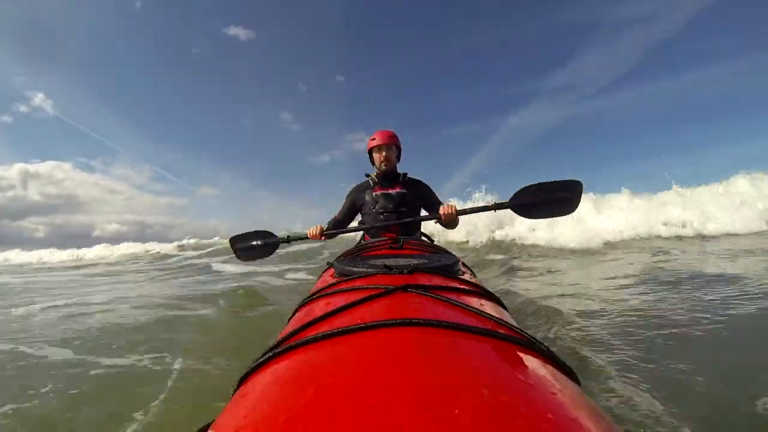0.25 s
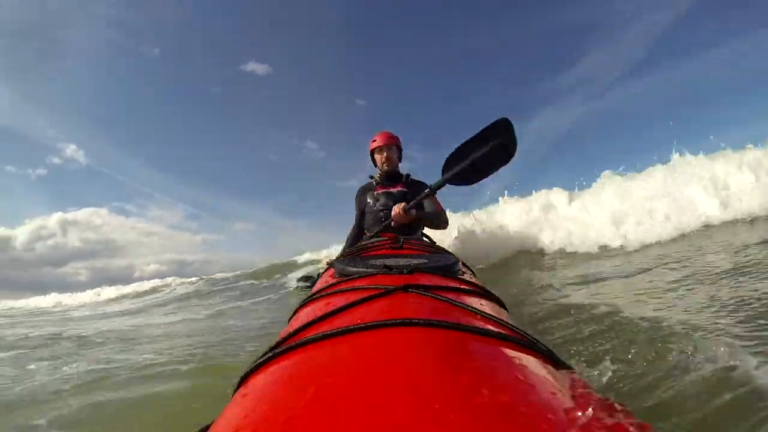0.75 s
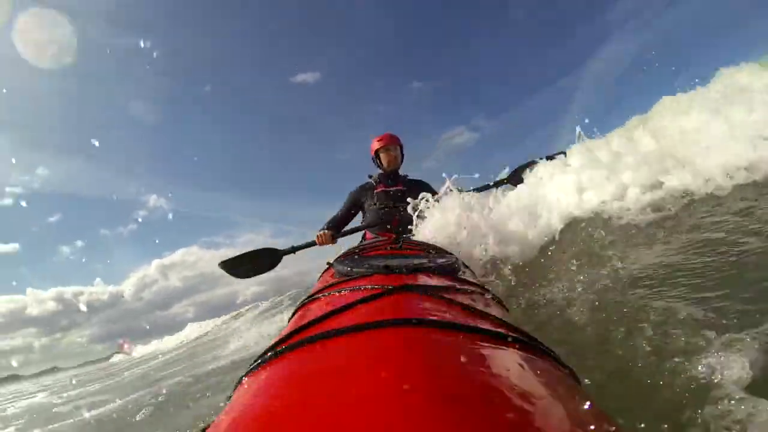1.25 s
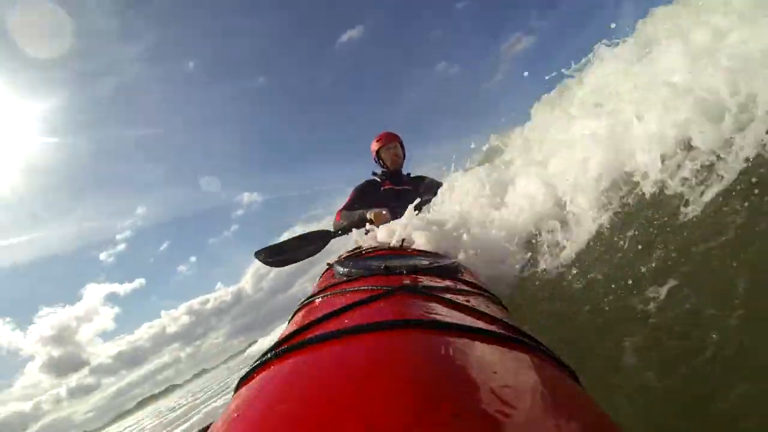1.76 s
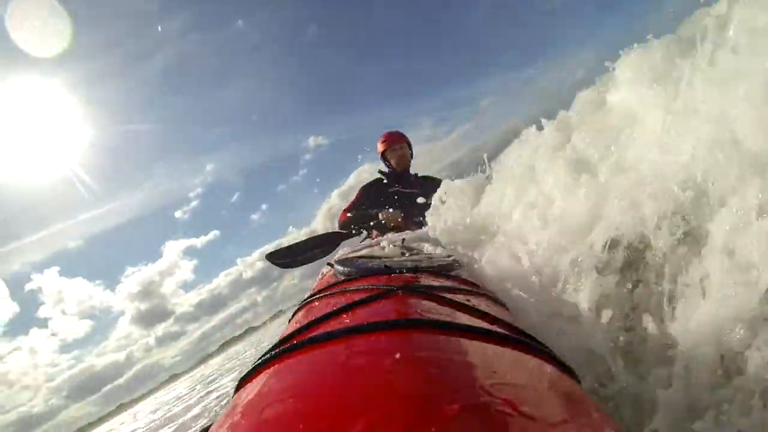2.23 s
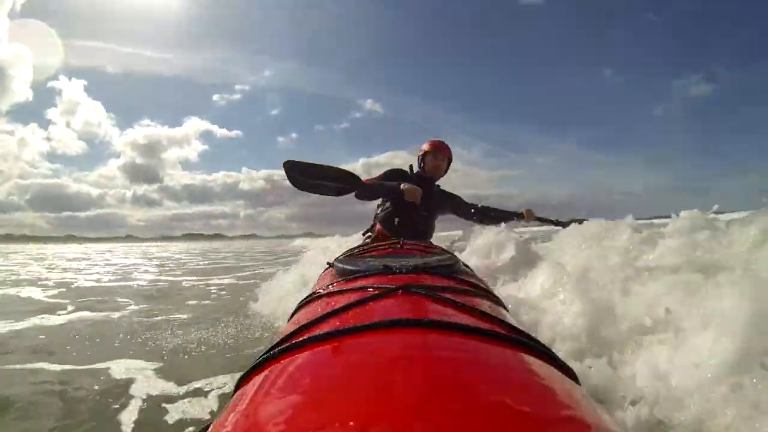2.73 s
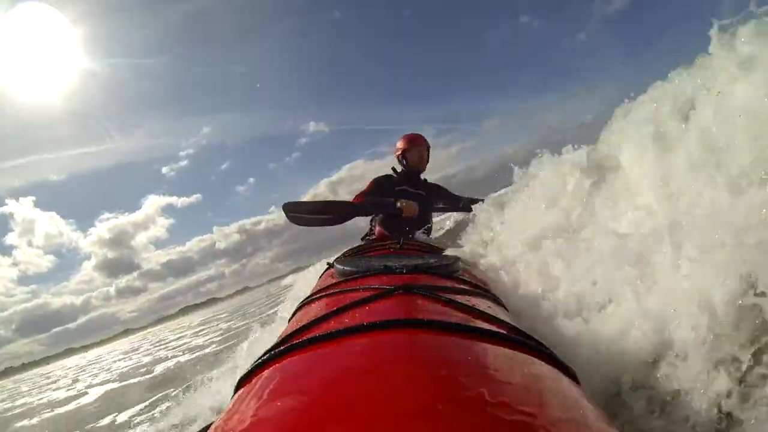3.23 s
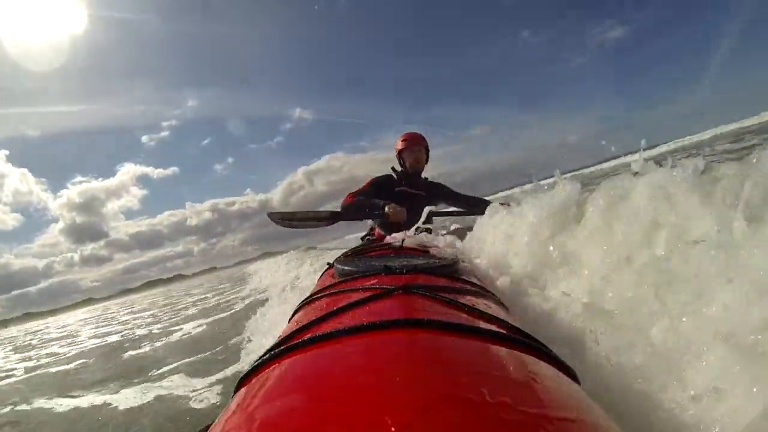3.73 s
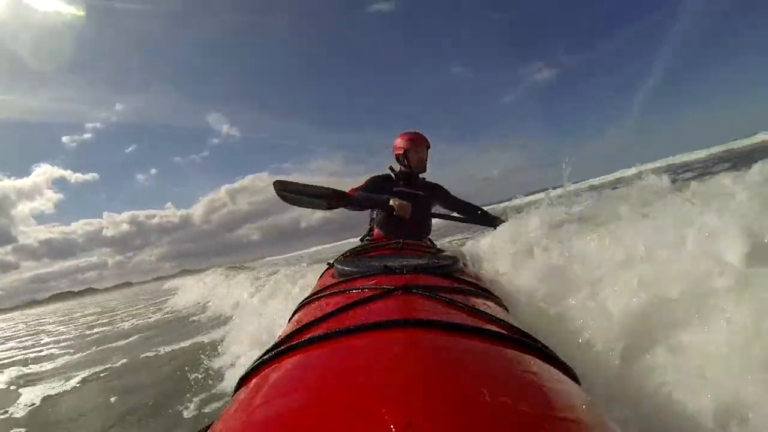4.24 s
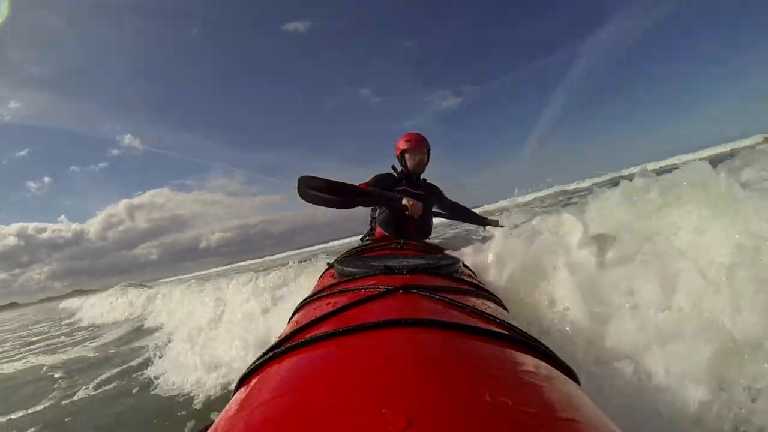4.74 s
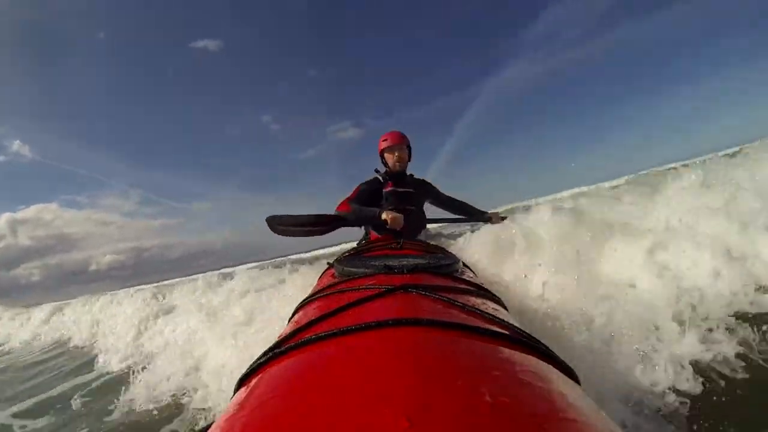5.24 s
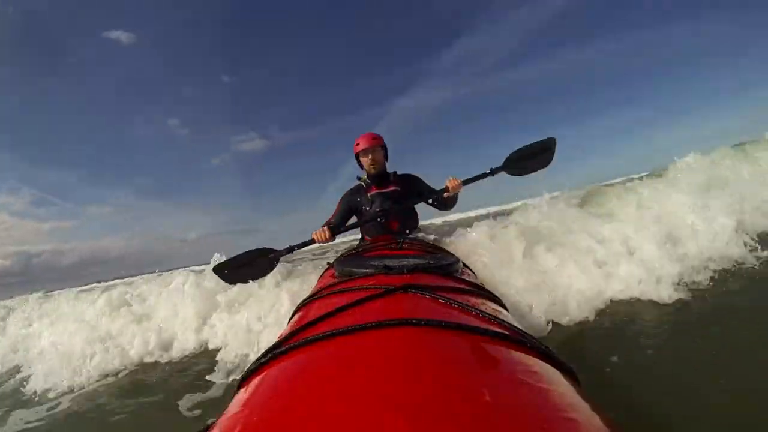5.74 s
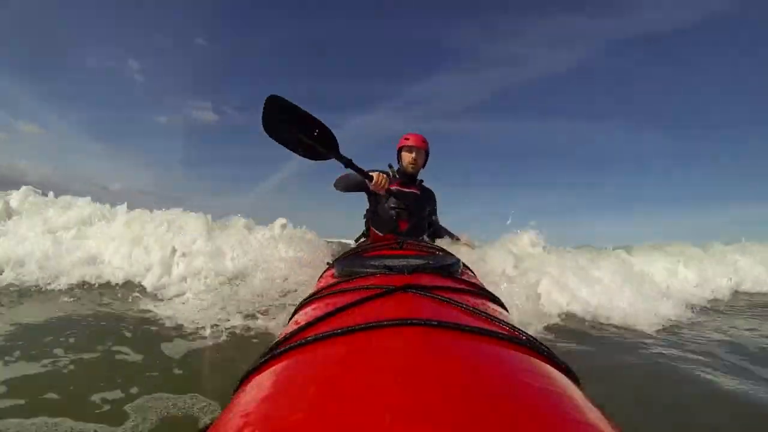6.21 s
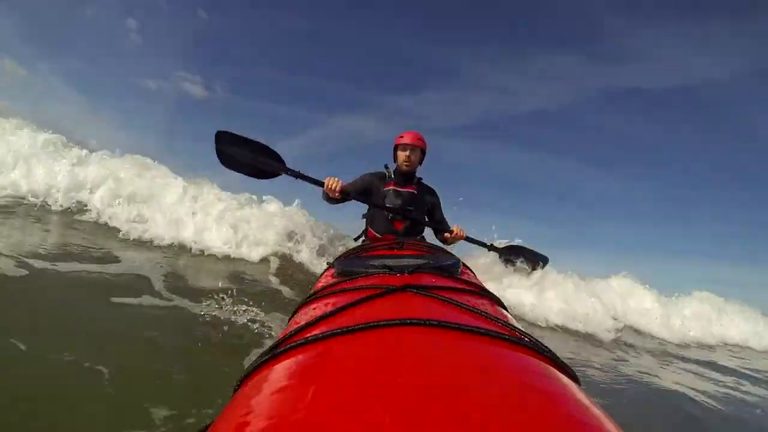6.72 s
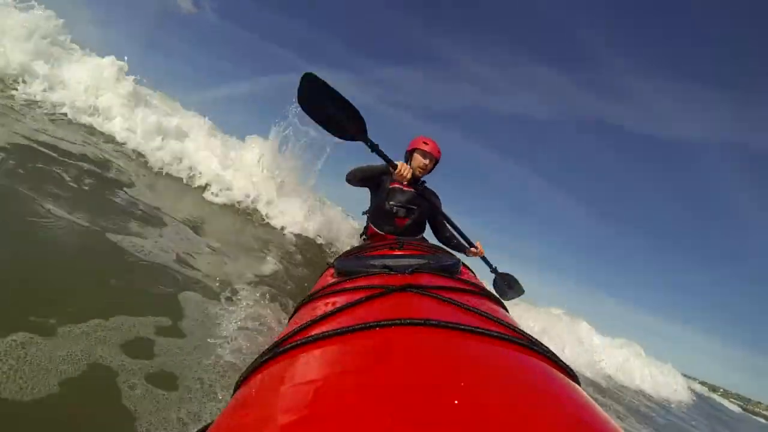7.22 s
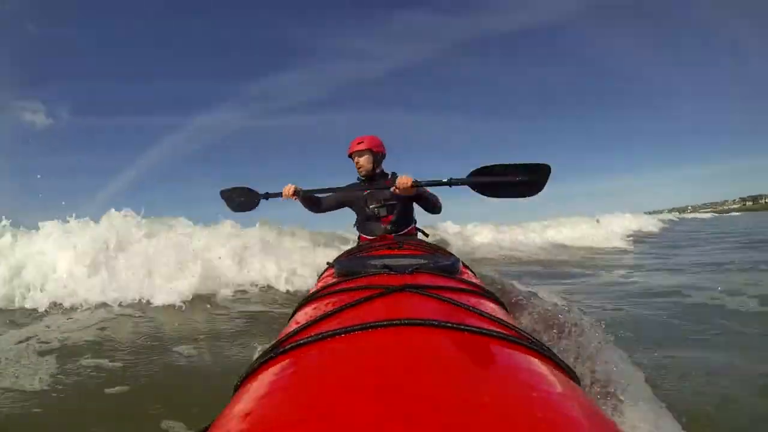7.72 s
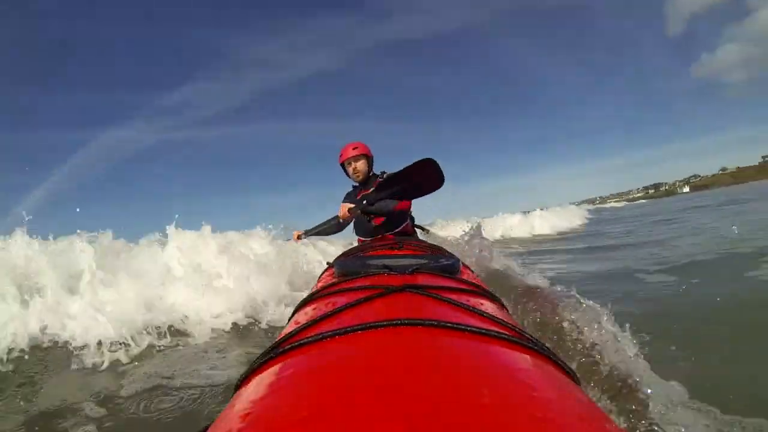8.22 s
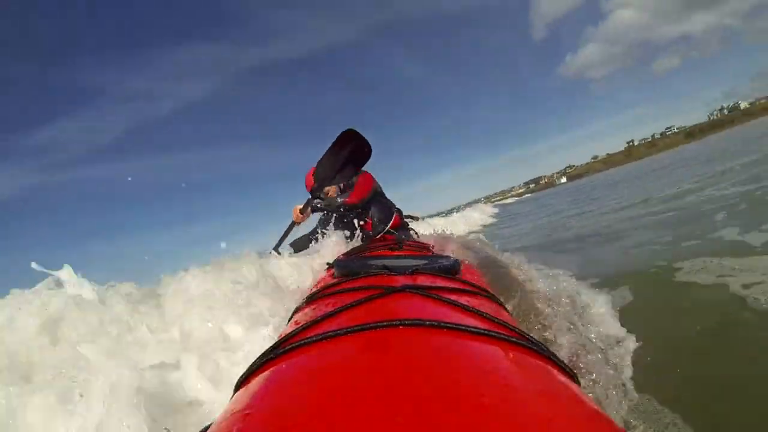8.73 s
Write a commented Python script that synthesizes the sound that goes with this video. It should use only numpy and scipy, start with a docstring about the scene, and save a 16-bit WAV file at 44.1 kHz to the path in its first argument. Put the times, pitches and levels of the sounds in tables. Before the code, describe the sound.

The microphone sits inside a waterproof case on a kayak's bow, so the surf sounds boxy and muffled, over a hollow, booming hull. At first there is only low wash, faint foam fizz and small plops. From 0.6 to 1.3 s close splashing bursts in, lumpy and bubbly, with ringing plops, spray ticks, paddle gulps and sharp slaps. More plops and a hard slap come at 1.5-2 s. Around 2.1 s a dull breaker roar and deep buffeting swell, then drop briefly. From 2.7 to 4 s wave slaps crack, knock and thud in quick runs, with plastic clicks and very low mount throbs. From 4 to 6 s the wash is steadier and duller, with scattered slaps. At 6-7.5 s bubbly splashes and hissing water sheets return. Plops, slaps and a click follow; from 8.3 s the rush and rumble strengthen, ending amid heavy splashes near 9 s.

```python
"""A kayak punches through breaking surf, heard from a camera in a waterproof case on its bow.
From the start whitewater roars and foam fizzes, noise drums on the hull and the camera mount swings low.
Soon sheets of water hiss past, air pockets plop, drips fall, spray ticks on the case and the paddle gulps.
Then waves slap the bow in runs of noise blows, and from two seconds on the housing clicks now and then.
Filters shaped like the case, the deck and the hollow hull give most layers a boxy or booming ring."""
import sys
import numpy as np
from scipy import signal
from scipy.fft import rfft, irfft, next_fast_len
from scipy.io import wavfile
from scipy.ndimage import uniform_filter1d, minimum_filter1d

SR = 44100
rng = np.random.default_rng(int(sys.argv[2]) if len(sys.argv) > 2 else 0)


def file_out(sig):
    """Save sig as 16-bit WAV at sys.argv[1]."""
    # one column per channel
    cols = np.atleast_2d(sig).T
    # limit, then scale
    lim = np.clip(cols, -1, 1)
    pcm = np.round(lim * 32767).astype(np.int16)
    wavfile.write(sys.argv[1], SR, pcm)


N = 395577
TIME = np.arange(N) / SR  # s


def gain_of(db):
    """Decibels to amplitude."""
    return 10 ** (np.asarray(db) / 20)


def evened(x):
    """Scales to rms 1."""
    return x / np.sqrt(np.mean(x ** 2) + 1e-20)


def curve(rows):
    """Joins (seconds, value) rows by straight lines."""
    seconds, values = np.transpose(rows)
    return np.interp(TIME, seconds, values)


def add(mix, start_s, sound):
    """Mixes a sound in at its start time, cut off at the end of the mix."""
    part = mix[max(round(start_s * SR), 0):][:len(sound)]
    part += sound[:len(part)]


def body(points, rings=(), size=8192):
    """Minimum-phase impulse response of a (Hz, dB) spectrum with resonances on top."""
    hz = np.fft.rfftfreq(size, 1 / SR)
    point_hz, point_db = np.transpose(points)
    db = np.interp(np.log(hz + 1), np.log(point_hz + 1), point_db)
    for centre_hz, width_hz, lift_db in rings:
        db = db + lift_db / (1 + (2 * (hz - centre_hz) / width_hz) ** 2)
    both_sides_db = np.r_[db, db[-2:0:-1]]
    log_gain = np.log(gain_of(both_sides_db))
    # the Hilbert transform of the log gain supplies the phase
    spectrum = np.exp(np.conj(signal.hilbert(log_gain)))
    return np.fft.ifft(spectrum).real[:size // 2]


def through(x, response):
    """Passes a sound through a body."""
    return signal.oaconvolve(x, response)[:len(x)]


def dulled(x, hz):
    """A gentle one-pole low-pass."""
    return signal.lfilter([1], [1, -np.exp(-2 * np.pi * hz / SR)], x)


def drift(per_s, order=16):
    """Smooth random wandering of rms 1, with rates above about per_s fading out."""
    size = next_fast_len(N // order + 2)  # made at a lower rate, then interpolated
    hz = np.fft.rfftfreq(size, order / SR)
    spectrum = rfft(rng.standard_normal(size)) * np.exp(-(hz / per_s) ** 2)
    slow = evened(irfft(spectrum, size))
    return np.interp(np.arange(N) / order, np.arange(size), slow)


def surges(rows, rise_s, fall_s):
    """Summed power of pushes that each build up, hold for their length and die away."""
    power = np.zeros(N)
    age = np.arange(SR) / SR
    for start_s, length_s, db in rows:
        rise = 1 - np.exp(-age / rise_s)
        fall = np.exp(-np.maximum(age - length_s, 0) / fall_s)
        add(power, start_s, (gain_of(db) * rise * fall) ** 2)
    return power


def bubble(hz, cycles, glide, size=2048):
    """A pocket of air rings and dies; its pitch climbs as it nears the surface."""
    age = np.arange(size) / SR * hz / cycles  # in decay times
    turns = cycles * (age + glide * (age - 1 + np.exp(-age)))
    envelope = np.exp(-age) * (1 - np.exp(-5 * age))
    return np.sin(2 * np.pi * turns) * envelope


def gurgle(per_s, spread_db, low_hz, high_hz, cycles, count=30):
    """Swarms of bubbles around count pitches; a spread makes many faint and a few strong."""
    out = np.zeros(N)
    for hz in np.geomspace(low_hz, high_hz, count):
        chance, place, strength = rng.random((3, 3000))
        born = chance < per_s * N / SR / count / len(chance)
        strengths = gain_of(spread_db * np.minimum(-np.log(1 - strength), 3))
        births = np.bincount((place * N).astype(int), strengths * born, N)
        pitch_hz = hz * 2 ** (rng.normal() / 20)
        ring_cycles = cycles * (.5 + rng.random())
        ring = bubble(pitch_hz, ring_cycles, glide=0.046 * rng.random(), size=1024)
        out += hz * through(births, ring)  # higher pitches are weighted up
    return evened(out)


def blow(response, decay_s, size=6000):
    """A sudden impact and the turbulence behind it ring a body; slower decays carry more energy."""
    push = rng.standard_normal(size) * np.exp(-np.arange(size) / SR / decay_s)
    push[0] = 0.49 * np.linalg.norm(push)  # the impact itself
    sound = through(push, response)
    return sound / np.linalg.norm(sound) * np.sqrt(decay_s * SR / 10)


# Loudness of the surf as breakers come and go. Each row: time in seconds, relative level in dB.
SURF_LEVEL = [(0, -38), (.55, -32), (.8, -22), (1.35, -21.5), (1.62, -28.5), (1.98, -22), (2.22, -19),
              (2.34, -30), (2.62, -33), (2.8, -27.5), (3.45, -27.5), (4.6, -31), (5.8, -31), (6.6, -23.5),
              (7.0, -24), (7.7, -24), (8.55, -21), (8.97, -21.5)]
# Loads of water thrown over the bow by paddle and waves.
# Each row: start in seconds, length in seconds, relative level in dB.
BOW_SPLASHES = [(0.285, 0.073, -35), (0.645, 0.1, -25), (0.76, .1, -17.5), (0.9, 0.022, -21.5),
                (1.1, 0.22, -19.5), (1.765, .05, -16), (2.11, 0.022, -17.5), (4.07, 0.14, -31),
                (4.86, .05, -26.5), (6.01, 0.016, -24.5), (6.17, 0.026, -22), (6.74, 0.12, -21.5),
                (7.18, 0.057, -22), (8.74, 0.024, -15)]


def water_level():
    """Amplitude of the water at the bow: the surf with the splashes added in power."""
    surf_power = gain_of(curve(SURF_LEVEL)) ** 2
    return np.sqrt(surf_power + surges(BOW_SPLASHES, rise_s=0.0063, fall_s=0.031))


# How much of the water is close splashing rather than far roar.
# Each row: time in seconds, share of the power from 0 to 1.
CLOSE_SHARE = [(0, 0.15), (.55, 0.88), (.7, 0.87), (1.35, 0.72), (1.6, 0.2), (2.15, 0), (2.4, 0.26),
               (5.9, 0.1), (6.4, 0.71), (7.3, 0.63), (8.97, 0.27)]


def water(case, roar_db=-1, wash_db=-1, dull_hz=2200):
    """The far roar is smooth and dull; close splashing is lumpy, bright and full of bubbles."""
    near = curve(CLOSE_SHARE)
    roar = dulled(rng.standard_normal(N), dull_hz) * gain_of(2.2 * drift(per_s=26))
    wash = gain_of(wash_db) * rng.standard_normal(N)
    bubbles = gurgle(per_s=3000, spread_db=7.5, low_hz=703, high_hz=6404, cycles=5.3)
    splash = (bubbles + wash) * gain_of(3.7 * near * drift(per_s=19))  # the closer, the lumpier
    colour = body([(300, 1.0), (800, -6), (1350, -3.5), (1800, 2.5), (3500, 0.0),
                   (4800, -2.0), (6500, 0.5), (12000, -14.5)])
    splash = through(splash, colour)
    far = gain_of(roar_db) * np.sqrt(1 - near) * evened(through(roar, case))
    close = np.sqrt(near) * evened(through(splash, case))
    return water_level() * (far + close)


# Bursting foam. Each row: time in seconds, level in dB before the foam trim.
FOAM_LEVEL = [(0.0, -63.5), (0.37, -64), (0.87, -57), (1.26, -57), (1.93, -58.5), (2.28, -54.5),
              (2.77, -58), (3.25, -55), (5.43, -61), (7.51, -61), (8.65, -59), (8.75, -59.5), (8.9, -62)]
# Colour of the foam as it hisses through the case. Each row: frequency in Hz, relative level in dB per Hz.
FOAM_COLOUR = [(2470, -33), (4200, -3.5), (5100, -5.5), (5970, -9.5), (6650, -10), (7560, -10), (8520, -13),
               (9390, -19.5), (10000, -17), (12200, -18.5), (13800, -20.5), (15300, -22)]


def foam(level_db=3):
    """Countless tiny bursts merge into a faint hiss: filtered noise with a fast flutter."""
    bursts = rng.standard_normal(N) * gain_of(1.6 * drift(per_s=320))
    return gain_of(curve(FOAM_LEVEL) + level_db) * evened(through(bursts, body(FOAM_COLOUR)))


# Buffeting of the hull by wind and water. Each row: time in seconds, relative level in dB.
BUFFETING = [(0, -42.5), (.75, -32.5), (1.3, -29), (2.1, -18), (2.62, -31), (2.78, -20.5), (3.25, -22.5),
             (3.55, -26), (4.6, -25), (4.85, -23), (5.75, -28), (6.12, -23.5), (6.3, -34), (7.0, -31),
             (7.25, -28), (8.15, -32), (8.45, -23.5), (8.97, -24)]


def rumble(hull, deck, level_db=-1, lumpy_db=3.0, churn_db=-16):
    """Gusts and heavy water drum on the hollow boat and churn big bubbles under the deck."""
    push = rng.standard_normal(N) * gain_of(lumpy_db * drift(per_s=53))
    churn = gurgle(per_s=600, spread_db=0.0, low_hz=328.0, high_hz=1289, cycles=7.7, count=14)
    drumming = gain_of(level_db) * evened(through(push, hull))
    churning = gain_of(churn_db) * evened(through(churn, deck))
    return gain_of(curve(BUFFETING)) * (drumming + churning)


# Centre of the mount's natural frequency under changing load. Each row: time in seconds, frequency in Hz.
MOUNT_PITCH = [(0.0, 35.06), (2.1, 33.95), (2.27, 31.7), (2.72, 35.6), (7.55, 33.97), (8.22, 38.46),
               (8.32, 34.04), (8.97, 37.5)]
# Swells that heave the boat and set the camera mount swinging.
# Each row: start in seconds, length in seconds, relative level in dB.
SWELLS = [(1.21, .38, -14.5), (1.75, 0.34, -5.5), (2.66, 0.095, -7.5), (3.1, .27, -11), (3.82, 0.078, -6.5),
          (4.22, 0.093, -13), (4.5, 0.28, -12), (4.77, 0.26, -8), (5.2, 0.16, -10.5), (5.42, 0.23, -8.5),
          (5.96, 0.35, -11.5), (6.35, 0.24, -21), (7.48, 0.16, -13.5), (7.75, 0.17, -15.5),
          (8.3, 0.22, -13), (8.42, 0.31, -9.5), (8.75, 0.2, -4.5)]


def mount(level_db=-1, flutter_db=1.3, waver=0.0395, over_buffeting_db=7.5, limit_db=-20):
    """Swells swing the camera at a low, wavering pitch; random buffeting pushes build it up or stall it."""
    shaken = gain_of(np.minimum(curve(BUFFETING) + over_buffeting_db, limit_db))
    pushes = (drift(per_s=5.3) + 1j * drift(per_s=7.2)) / np.sqrt(2)
    heave = np.sqrt(surges(SWELLS, rise_s=0.025, fall_s=0.099))
    heave = heave * gain_of(flutter_db * drift(per_s=26))
    hz = curve(MOUNT_PITCH) * (1 + waver * drift(per_s=10.4))
    turns = np.cumsum(hz) / SR
    swing = (heave + shaken * pushes) * np.exp(2j * np.pi * turns)
    return gain_of(level_db) * np.sqrt(2) * swing.real


# Sheets of whitewater hissing along the deck. Each row: start in seconds, length in seconds, level in dB.
DECK_SHEETS = [(0.1, 0.025, -39), (0.53, 0.022, -37), (1.26, 0.032, -35), (4.06, 0.05, -52),
               (6.28, 0.38, -39.5), (6.55, .32, -44), (7.14, 0.061, -33), (7.45, 0.52, -45.5)]


def sheets(case):
    """Thin, fast water seethes with countless tiny bubbles: bright noise with a fast flutter."""
    seethe = rng.standard_normal(N) * gain_of(2.3 * drift(per_s=150))
    colour = body([(500, -31.5), (1600, -18.5), (2600, 0.5), (3500, 2), (5000, -4), (9000, -8)])
    seethe = evened(through(through(seethe, colour), case))
    return np.sqrt(surges(DECK_SHEETS, rise_s=0.014, fall_s=.035)) * seethe


# The strongest single bubbles.
# Each row: start in seconds, peak in dB before the plop trims, starting pitch in Hz.
SINGLE_BUBBLES = [(0.169, -31, 955), (0.187, -25, 1790), (0.295, -15.5, 1750), (0.338, -12, 1480),
                  (0.358, -17, 1860), (0.445, -23, 836), (0.456, -23, 2440), (0.528, -17, 1360),
                  (0.652, -8, 1400), (0.665, -7, 1705), (0.682, -5.5, 1406), (0.78, -5.5, 1363),
                  (0.953, -12, 3250), (0.987, -19, 2880), (1.006, -6.5, 1530), (1.117, -4, 1790),
                  (1.145, -15, 3390), (1.219, -6.5, 1350), (1.502, -11.5, 1390), (1.691, -10.5, 1940),
                  (1.74, -7, 1535), (1.962, -10.5, 1650), (6.778, -13.5, 1750), (6.823, -9, 1590),
                  (7.025, -7.5, 1755), (7.555, -10.5, 1457), (7.909, -8.5, 1670), (8.261, -9, 1620),
                  (8.406, -6.5, 1690)]


def plops(case, level_db=-.5, smack_db=-5, satellites_db=-9, count=3):
    """Water smacks shut over a pocket of air, which rings and sheds a few smaller bubbles."""
    out = np.zeros(N)
    for start_s, peak_db, hz in SINGLE_BUBBLES:
        ring = bubble(hz, cycles=6.2, glide=0.013)
        add(out, start_s, gain_of(peak_db + level_db) * ring / abs(ring).max())
        add(out, start_s, gain_of(peak_db + smack_db) * blow(case, decay_s=0.0025))
        for delay, pitch in rng.random((count, 2)):
            shed = bubble(hz * (.85 + .6 * pitch), cycles=2.8, glide=.03)
            add(out, start_s + 0.013 * delay, gain_of(peak_db + satellites_db) * shed)
    return out


def droplets(level_db=-17):
    """Thrown water falls back as small bright drips, strongest when the splashing is close."""
    drips = gurgle(per_s=34, spread_db=13.5, low_hz=2040, high_hz=6080, cycles=4.7, count=22)
    drips = through(drips, body([(3500, 1), (4300, -8.5), (6000, -16.0)]))
    thrown = curve(CLOSE_SHARE) ** 4  # nearly silent unless splashing dominates
    return water_level() * gain_of(level_db) * thrown * evened(drips)


# Handfuls of spray landing on the case.
# Each row: start in seconds, relative level in dB, decay time in seconds.
SPRAY_HANDFULS = [(0.64, -47, .012), (0.813, -35, 0.032), (0.841, -34, 0.024), (0.901, -37.5, 0.025),
                  (1.107, -37, .012), (1.217, -36, 0.028), (1.293, -37, 0.0099), (1.506, -37.5, 0.0082)]


def spray(drops_per_s=1300, mist_db=-22, size=4000):
    """Handfuls of drops strike the case itself, so they keep their treble."""
    out, age = np.zeros(N), np.arange(size) / SR
    shell = body([(800, -15), (1700, -3), (3500, 29), (5800, 17), (7500, 9.5), (15000, 3)])
    for start_s, level_db, decay_s in SPRAY_HANDFULS:
        strength, mist = rng.standard_normal((2, size))
        landing = rng.random(size) < drops_per_s / SR
        drops = .5 * strength * landing + gain_of(mist_db) * mist
        drops[0] = 1  # a set drop leads
        ticks = through(drops * np.exp(-age / decay_s), shell)
        add(out, start_s, gain_of(level_db) * 2 * ticks)
    return out


# The paddle blade digging in and stirring big bubbles.
# Each row: start in seconds, length in seconds, level in dB.
PADDLE_STROKES = [(0.66, .06, -25.5), (0.755, 0.023, -14), (1.18, 0.11, -24), (1.92, .28, -31.5),
                  (2.72, 0.096, -32), (7.2, 0.074, -27.5), (8.38, .22, -26.5), (8.68, 0.076, -30)]


def strokes(case):
    """The blade drags air under water, where it gulps in large, low bubbles."""
    gulps = gurgle(per_s=1200, spread_db=4.0, low_hz=714, high_hz=1376, cycles=4.4, count=14)
    return np.sqrt(surges(PADDLE_STROKES, rise_s=.012, fall_s=0.027)) * evened(through(gulps, case))


# Waves slapping the bow. Each row: start in seconds, crack, knock of the deck and thud of the hull
# in dB before the slap trims, clatter length in seconds.
BOW_SLAPS = [(0.764, -3, -24, -23.5, .006), (0.832, 0.5, -45, -26, .005), (1.165, -2, -41, -20, .005),
             (1.775, -1.5, -12, -17, .022), (2.0835, -5, -22, -17, .007), (2.7048, -13, -22.5, -14, 0.046),
             (2.9107, -8.5, -13.5, -4.5, 0.036), (3.072, -3.5, -10.5, -10, .005),
             (3.091, -12, -10.5, -6, 0.04), (3.694, -6.5, -22, -16.5, 0.0075),
             (3.725, -15.5, -21, -15, .005), (3.8576, -16, -17.5, -35, .008), (4.121, -12, -24, -32, 0.012),
             (4.3256, -14.5, -28, -7, .026), (4.747, -7, -29, -30, 0.034), (6.1236, -31, -46, -11, 0.0074),
             (6.1846, -13, -21, -24, .005), (7.196, -6.5, -29, -31, .005), (7.728, -15, -29, -10.5, 0.029),
             (8.502, -8.5, -13.5, -29, .005), (8.678, -4.5, -18, -20, 0.0052),
             (8.754, -7.5, -31, -19, .006), (8.774, -9, -35, -6.5, 0.015)]


def slaps(case, deck, hull, crack_db=3, knock_db=6, thud_db=4, gap_s=.018, jitter=0.24, count=4):
    """Quick runs of fading blows: each cracks, while the deck knocks and the hull thuds a little longer."""
    out = np.zeros(N)
    bright = through(case, body([(500, -1.0), (1400, 12), (2500, 7.5), (4500, 1.0), (12000, -17.0)]))
    deep = through(hull, body([(40, -9), (70, 0.5), (120, -2.0), (200, -3), (350, -14), (1000, -6.5)]))
    for start_s, crack, knock, thud, clatter_s in BOW_SLAPS:
        gaps = gap_s * (1 + jitter * rng.standard_normal(count - 1))
        for delay in np.r_[0, np.cumsum(gaps)]:
            hit = gain_of(crack + crack_db) * blow(bright, decay_s=0.0067)
            hit += gain_of(knock + knock_db) * blow(deck, decay_s=0.0095)
            hit += gain_of(thud + thud_db) * blow(deep, decay_s=0.017)
            add(out, start_s + delay, hit * np.exp(-(delay / clatter_s) ** 2))
    return out


# The camera housing clicking when the boat is jolted. Each row: start in seconds, relative level in dB.
HOUSING_CLICKS = [(2.083, -14.5), (2.7041, -14), (2.728, -20), (3.01, -22), (4.327, -29), (4.341, -25),
                  (4.357, -21), (7.752, -15)]


def clicks(case):
    """Hard plastic snaps: short, and brighter than a slap of water."""
    out = np.zeros(N)
    plastic = through(case, body([(500, -17), (1600, -19), (2700, 10), (3800, 7), (6000, -3), (12000, -10)]))
    for start_s, level_db in HOUSING_CLICKS:
        add(out, start_s, gain_of(level_db) * blow(plastic, decay_s=0.003))
    return out


# What the case lets through, the deck as a wave knocks on it, and the hollow hull, all before resonances.
# Each row: frequency in Hz, relative level in dB.
CASE_COLOUR = [(100, -29), (400, -12.5), (580, -26), (910, -31), (1200, -13), (1370, 0.5), (1730, 0.5),
               (2100, -10), (2800, -19.5), (3700, -21), (4200, -32), (5900, -39), (7000, -53.5),
               (15000, -45)]
DECK_COLOUR = [(100, -5.5), (400, -4.5), (600, -9), (900, -14), (1200, -1), (1450, 4.5), (1900, 3),
               (2600, -26.5), (5000, -40), (12000, -63)]
HULL_COLOUR = [(35, -4), (55, -0.5), (85, -5.5), (135, -10.5), (200, -14), (300, -18), (410, -12.5),
               (520, -28.5), (700, -33.5), (1500, -53), (4000, -84)]
# Resonances of the case walls (the deck shares them) and of the hull.
# Each row: centre in Hz, width in Hz, lift in dB.
CASE_RESONANCES = [(803, 155, 21.5), (1025, 127, 11.5), (3250, 81, 3), (5370, 490, 6)]
HULL_RESONANCES = [(115.5, 19, 7.5), (153.2, 8.5, 10), (261, 14.2, 6), (344, 26, 3)]


def scene():
    """Builds the ringing bodies and sums the water layers with those of the boat."""
    case = body(CASE_COLOUR, CASE_RESONANCES)
    deck = body(DECK_COLOUR, CASE_RESONANCES)
    hull = body(HULL_COLOUR, HULL_RESONANCES)
    surf = water(case) + foam() + sheets(case) + plops(case) + droplets() + spray() + strokes(case)
    boat = rumble(hull, deck) + mount() + slaps(case, deck, hull) + clicks(case)
    return (surf + boat)[None]


def record(dry, edge_hz=15400):
    """The level dips briefly round peaks above full scale; the ends fade and a low-pass trims the top."""
    peak_gain = 1 / np.maximum(abs(dry[0]), 1)
    smooth_gain = uniform_filter1d(minimum_filter1d(peak_gain, size=90), size=90)
    held = dry * smooth_gain
    faded = held * signal.windows.tukey(N, .001)
    low_pass = signal.firwin(511, edge_hz, window=("kaiser", 9), fs=SR)
    return signal.oaconvolve(faded, low_pass[None], "same")


dry = scene()
out = record(dry)
file_out(out)
```